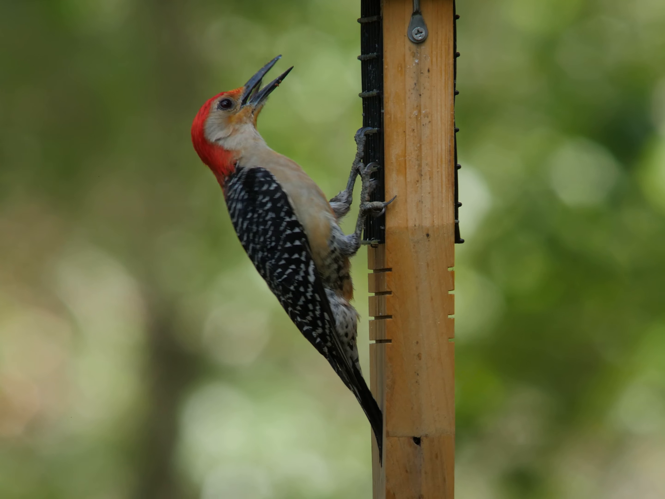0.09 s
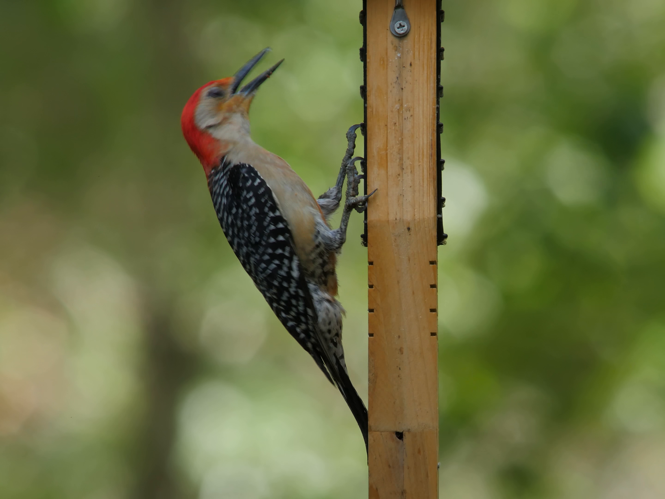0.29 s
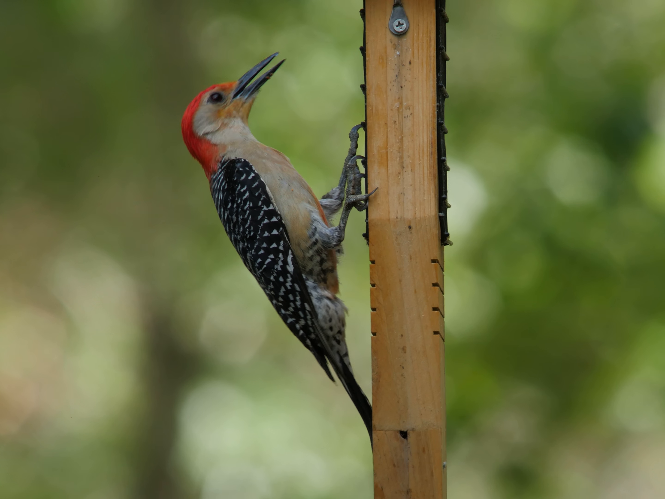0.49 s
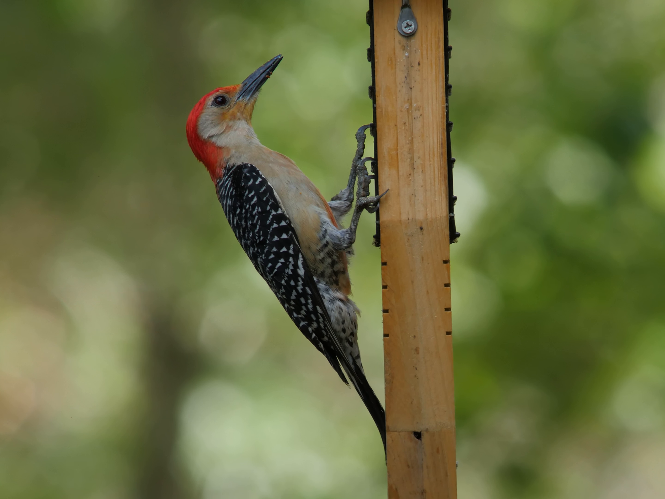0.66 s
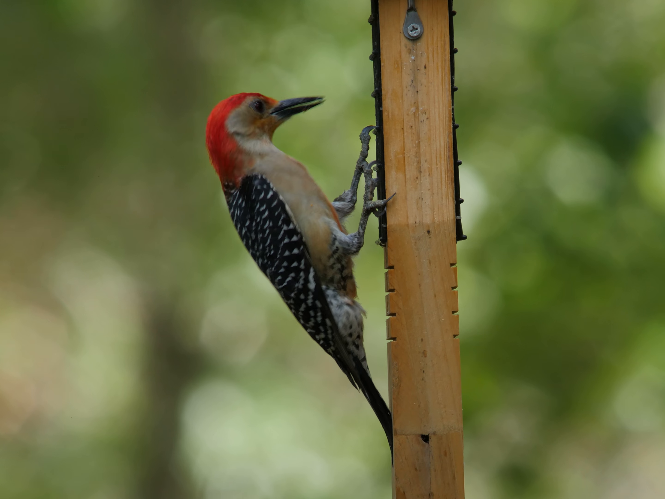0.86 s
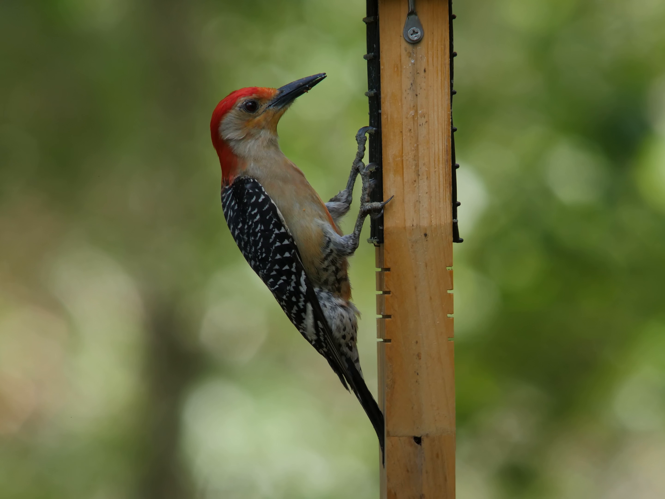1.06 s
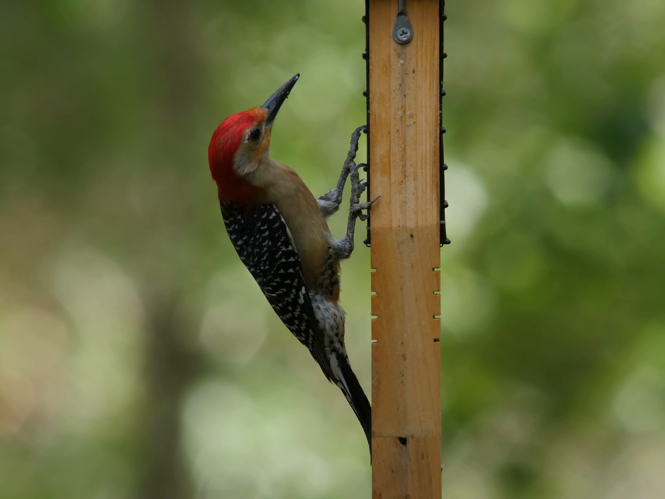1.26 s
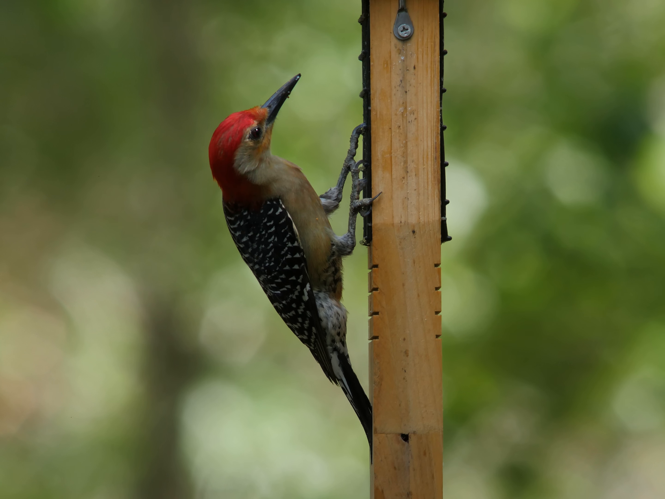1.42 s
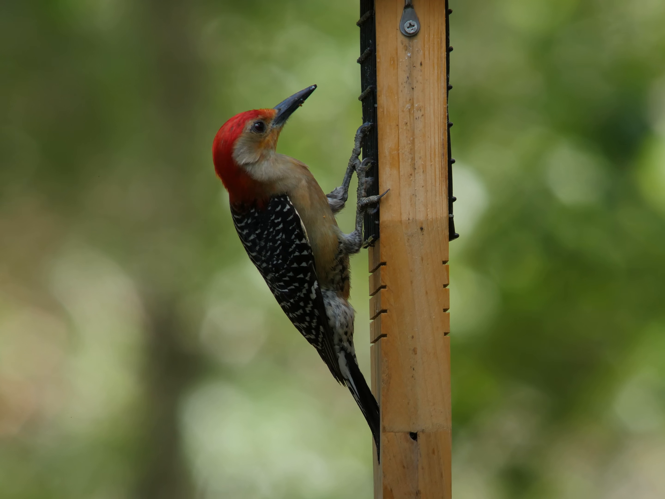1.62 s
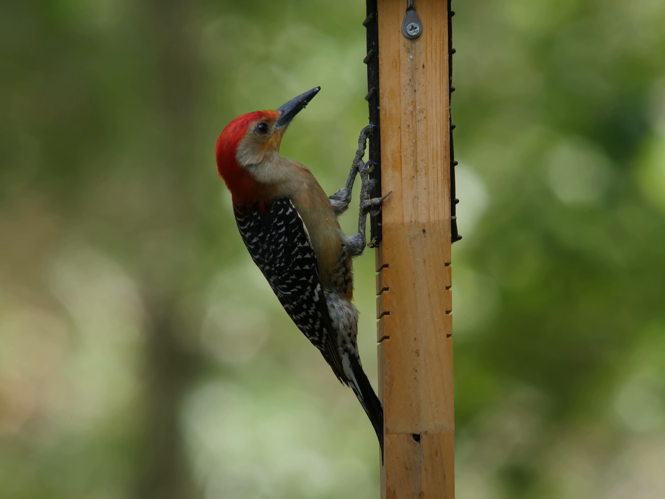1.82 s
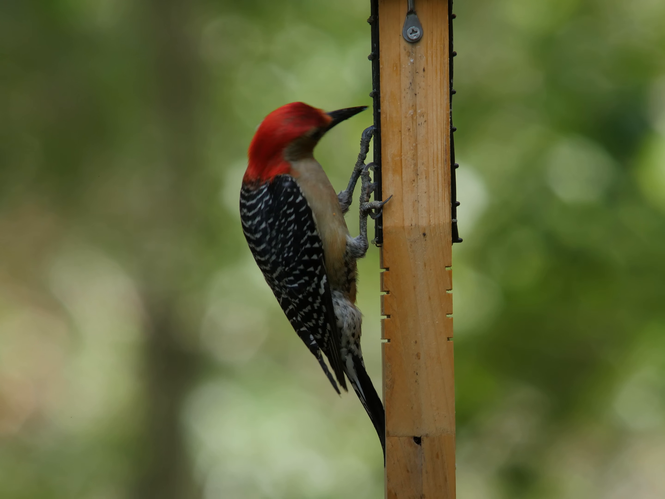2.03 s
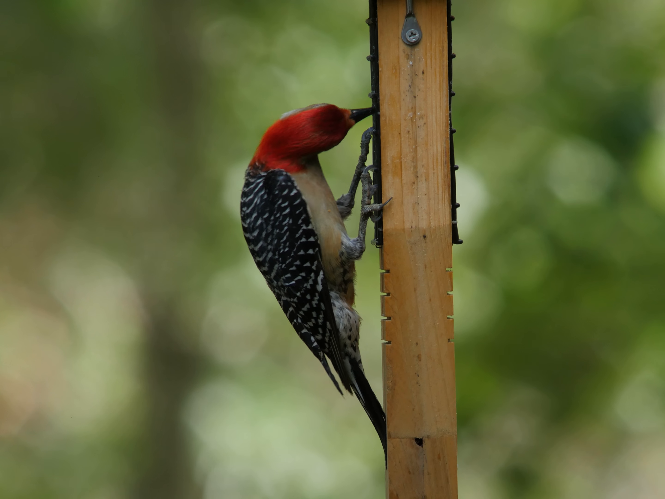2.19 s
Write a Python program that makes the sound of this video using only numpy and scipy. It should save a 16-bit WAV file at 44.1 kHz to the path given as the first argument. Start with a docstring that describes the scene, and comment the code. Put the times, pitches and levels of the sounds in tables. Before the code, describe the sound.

Outdoors in a leafy yard, a stereo microphone picks up a rapid woodpecker trill, slightly to the right, ringing away among trunks; faint distant birds, high steady insects, soft air and a distant machine hum remain.

```python
"""A woodpecker on a feeder whistles in a wooded yard that rings after it: one short rising note, then
seven rising two-note calls, each a gliding near-pure tone with a faint overtone, wall slaps and tree echoes.
Far birds whistle faintly as wavering glides, and a double tick of noise sounds at the feeder.
Insects buzz near 8 kHz as shaped noise and throbbing resonances; a distant machine drones in low
wavering sines; the yard's air is soft, patchy stereo noise."""
import sys
import numpy as np
from scipy import signal
from scipy.io import wavfile
from scipy.ndimage import uniform_filter1d

SR = 44100
rng = np.random.default_rng(int(sys.argv[2]) if len(sys.argv) > 2 else 0)


def to_linear_factor(level_db):
    """Convert decibel levels (scalar or array-like) to linear amplitude factors."""
    exponent = np.asarray(level_db, float) / 20
    return 10 ** exponent


def put_to_file(sound):
    """Save the sound as 16-bit audio at rate SR, in the file named by the first command-line argument."""
    columns = np.atleast_2d(sound).T  # one column per channel
    safe = np.clip(columns, -1, 1)
    whole_steps = np.round(safe * 32767)
    wavfile.write(sys.argv[1], SR, whole_steps.astype(np.int16))


N = 101429
T = np.arange(N) / SR


def evened(x):
    """Scales a sound to an rms of 1."""
    return x / np.sqrt(np.mean(x ** 2) + 1e-20)


def read(points, hz):
    """Reads a curve of (frequency, value) points along a logarithmic frequency axis."""
    f, value = np.transpose(points)
    return np.interp(np.log(hz + 1), np.log(f + 1), value)


def drift(top_hz):
    """Random wander of rms 1: twelve sines of random phase over the decade below top_hz."""
    total = np.zeros(N)
    for f in np.geomspace(top_hz / 10, top_hz, 12):
        total += np.sin(2 * np.pi * (f * T + rng.random())) / np.sqrt(f)
    return evened(total)


def resonate(x, hz, width_hz):
    """One resonance of gain 1: shifts hz down to zero, smooths there and shifts back."""
    turn = np.exp(2j * np.pi * hz * T)
    r = np.exp(-np.pi * width_hz / SR)
    return 2 * (turn * signal.lfilter([1 - r], [1, -r], x / turn)).real


def noise(spectrum, likeness, patchy_db):
    """Stereo noise of rms 1 with a given spectrum, left-right likeness and drifting loud and soft patches."""
    frames, hz = N // 256 + 5, np.fft.rfftfreq(1024, 1 / SR)
    a, b, c, d, patches = rng.standard_normal((frames, 513, 5)).T
    patches = uniform_filter1d(patches, 12, 0)  # across frequency
    patches = evened(uniform_filter1d(patches, 14, 1))  # across time
    same = np.clip(read(likeness, hz), -1, 1)[:, None]
    left = a + 1j * b
    right = same * left + np.sqrt(1 - same ** 2) * (c + 1j * d)
    z = np.array([left, right]) * to_linear_factor(read(spectrum, hz)[:, None] + patchy_db * patches)
    return evened(signal.istft(z, nperseg=1024, noverlap=768)[1][:, :N])


def echoes(x, t60s):
    """Scattered returns from trunks and leaves; three tails take turns so that like calls ring differently."""
    out = np.zeros((2, N))
    for k in range(3):
        # one tap of random sign at a random place in every 20 samples
        taps = np.zeros((2, SR))
        at = np.arange(200, SR - 20, 20) + rng.integers(0, 20, (2, (SR - 201) // 20))
        np.put_along_axis(taps, at, rng.choice([-1., 1.], at.shape), 1)
        # each frequency dies away at its own rate
        hz, t, z = signal.stft(taps, SR, nperseg=256)
        t60 = read(t60s, hz)[:, None]
        tail = signal.istft(z * to_linear_factor(-60 * t / t60) / np.sqrt(t60), SR, nperseg=256)[1]
        tail = tail / np.linalg.norm(tail[0])
        share = np.sqrt(2 / 3) * np.cos(np.pi * (T / 1.2 + k / 3))
        out += signal.fftconvolve((x * share)[None], tail, axes=1)[:, :N]
    return out


def air():
    """The yard's air: broad noise, partly alike left and right, with drifting patches."""
    # relative spectrum: (frequency [Hz], density [dB])
    air_spectrum = [(25, -8.5), (60, -19), (150, -3), (300, -7.5), (700, -12), (1050, -15.5), (1130, -8.5),
                    (1230, -15), (2000, -18), (3500, -20.5), (5000, -28), (7000, -23), (10000, -21.5),
                    (13500, -30.5), (15200, -23)]
    # left-right correlation: (frequency [Hz], likeness [-1 to 1])
    air_likeness = [(60, 0.49), (130, 0.98), (290, 0.77), (640, 0.14), (1410, -0.25), (3100, -0.3),
                    (6820, 0.075), (15000, 0.49)]
    return to_linear_factor(-59.5) * noise(air_spectrum, air_likeness, patchy_db=1.56)


def drone():
    """Low machine sines that waver in pitch and level; the strongest pair sinks midway and swells late."""
    # machine tones: (frequency [Hz], level before swell and waver [dB])
    tones = [(48.4, -79), (90, -84), (120.8, -66.5), (145.3, -70.5), (210, -77.5), (240, -74.5), (270, -77),
             (300, -82)]
    # level change of the swelling pair: (time [s], level [dB])
    swell = [(0, 3.5), (.5, 3), (1.0, -4.5), (1.4, 0.5), (1.8, 7.5), (2.3, 7.5)]
    waver_db, lag_s, pan_db = 2.5, 0.00013, -0.7  # lag and pan are of the left side
    swell_db = np.interp(T, *np.transpose(swell))
    out = np.zeros(N)
    for hz, db in tones:
        swells = 110 < hz < 160
        cycles = np.cumsum(hz * (1 + 0.0049 * drift(3.04))) / SR
        phase = 2 * np.pi * (cycles + rng.random())
        level_db = db + swells * swell_db + waver_db * drift(4.11)
        out += np.sqrt(2) * to_linear_factor(level_db) * np.sin(phase)
    return np.array([to_linear_factor(pan_db) * np.roll(out, round(lag_s * SR)), out])


def insects():
    """A smooth far chorus of noise and a few nearer singers, narrow noise bands that throb together."""
    # relative spectrum of the chorus: (frequency [Hz], density [dB])
    chorus = [(5000, -32.5), (6800, -20), (7380, -6.5), (7730, -1.5), (7860, -5), (7960, 1), (8260, 4),
              (8820, 0.5), (9100, -9.5), (9500, -33), (12500, -63)]
    # nearer insects: (frequency [Hz], width [Hz], level relative to singers_db [dB])
    singers = [(7630, 60, -8), (8020, 70, -5), (8240, 30, -5), (8425, 20, -4), (8478, 12, -2),
               (8547, 20, -2), (8755, 20, -3)]
    chorus_db, singers_db, likeness = -55.5, -63, 0.14
    throb_hz, throb_depth = 55, .45
    out = to_linear_factor(chorus_db) * noise(chorus, [(100, likeness), (20000, likeness)], patchy_db=.4)
    beat = 2 * np.pi * (throb_hz * T + rng.random())
    throb = 1 + throb_depth * (np.cos(beat) + .6 * np.cos(2 * beat))
    for hz, width_hz, db in singers:
        a, b = rng.standard_normal((2, N))
        band = evened(resonate(np.array([a, 0.5 * a + 1.12 * b]), hz, width_hz))
        out += to_linear_factor(singers_db + db) * throb * band
    return out


def tick():
    """A double tick at the feeder: two brief bursts of noise in a bright resonance, with a short hissing tail."""
    # ticks: (time [s], level of the noise before the resonance [dB])
    ticks = [(2.045, -54), (2.051, -50)]
    burst_t60_s, tail_db, tail_t60_s = .03, -13, .2
    shape = np.zeros(N)
    for start, db in ticks:
        age = np.maximum(T - start, 0)
        burst = to_linear_factor(-60 * age / burst_t60_s)
        tail = to_linear_factor(tail_db - 60 * age / tail_t60_s)
        shape += (T >= start) * to_linear_factor(db) * (burst + tail)
    a, b = rng.standard_normal((2, N))
    return resonate(shape * np.array([a + .5 * b, a - .5 * b]), hz=11900, width_hz=1300)


def far_birds():
    """Soft, unsteady sine glides, mostly heard as echo."""
    # far whistles: (start [s], length [s], first pitch [Hz], last pitch [Hz])
    glides = [(.152, .04, 7300, 6200), (.48, .24, 6480, 6500), (.885, .1, 3830, 3810),
              (.96, .12, 3750, 3100), (1.25, .06, 3500, 4350), (1.33, .075, 3870, 3350),
              (1.395, .06, 3300, 2620), (1.47, .06, 2800, 3170), (1.56, .1, 2680, 2820),
              (1.87, .08, 2720, 2800), (1.77, .17, 3840, 3790), (1.755, .05, 6900, 6150),
              (1.84, .1, 3750, 3200), (1.52, .08, 3170, 3150)]
    # level of each whistle before flutter and echo: [dB]
    glide_levels = [-57.5, -70.5, -61, -62, -62, -49, -49, -65, -54.5, -63.5, -59, -61, -59.5, -65]
    dry_db, wobble_share, flutter_db = -11, .008, 4
    wobble = 1 + wobble_share * drift(150)
    flutter = to_linear_factor(flutter_db * drift(120))
    out = np.zeros(N)
    for (start, length, from_hz, to_hz), db in zip(glides, glide_levels):
        progress = np.clip((T - start) / length, 0, 1)
        hz = from_hz + (to_hz - from_hz) * progress
        phase = 2 * np.pi * np.cumsum(hz * wobble) / SR
        out += to_linear_factor(db) * np.sin(np.pi * progress) ** .5 * np.sin(phase)
    out = out * flutter
    # leaves swallow the high whistles sooner: (Hz, t60 s)
    return to_linear_factor(dry_db) * out + echoes(out, [(4000, 1.3), (6500, 0.77)])


def whistles():
    """The bare calls: two gliding near-pure notes each, with one faint overtone that grows with effort."""
    # calls, the opening one with its second note only:
    # (start [s], stretch of the shape, first note level [dB], base pitch [Hz], second note level [dB])
    calls = [(0.031, 0.78, -95, 2170, -54), (.208, 0.9, -42.5, 2276, -42.5),
             (0.351, 0.93, -39.5, 2316, -40.5), (0.511, 0.93, -37, 2321, -39.5),
             (0.666, 0.98, -35, 2338, -40.5), (.822, 1.01, -35, 2334, -40),
             (.978, 0.98, -34.5, 2341, -43.5), (1.138, 0.97, -36, 2341, -39)]
    # first note climbs, flips up and rounds over: (time into the unstretched call [s], pitch ratio)
    first_glide = [(0, .96), (.007, 1.0), (.027, 1.025), (.049, 1.055), (.057, 1.11), (.068, 1.265),
                   (.076, 1.305), (.09, 1.27)]
    # second note climbs: (time into the unstretched call [s], pitch ratio)
    second_glide = [(.07, 1.04), (.083, 1.06), (.098, 1.105), (.111, 1.15), (.119, 1.155)]
    # levels at those points, relative to the note's level: [dB]
    first_shape = [-31.5, -13, -4, 0.5, -7.5, -14.5, -27.5, -20]
    second_shape = [-36, -0.5, -0.5, -4.5, -25]
    wobble_share, flutter_db = .002, 1.2
    harmonic = 5
    wobble = 1 + wobble_share * drift(130)
    flutter = flutter_db * drift(130)
    out = np.zeros(N)
    for start, stretch, first_db, base_hz, second_db in calls:
        notes = (first_glide, first_shape, first_db), (second_glide, second_shape, second_db)
        for glide, shape_db, note_db in notes:
            s, ratio = np.transpose(glide)
            s = start + s * stretch
            hz = base_hz * np.interp(T, s, ratio)
            phase = 2 * np.pi * np.cumsum(hz * wobble) / SR
            # more effort brightens the note; the overtone weakens by 7 dB for each kHz it climbs
            effort_db = .7 * (note_db + 39)
            climb_db = -7 * (harmonic * hz - 11500) / 1000
            overtone = to_linear_factor(-27.5 + effort_db + climb_db) * np.sin(harmonic * phase)
            level_db = note_db + flutter + np.interp(T, s, shape_db, -200, -200)
            out += np.sqrt(2) * (np.sin(phase) + overtone) * to_linear_factor(level_db)
    return out


def woodpecker():
    """The calls in the yard: later and softer on the left, slapped back by walls, ringing in near and far trees."""
    # walls that throw the call back: (delay [s], left level [dB], right level [dB])
    slap_walls = [(.034, -4.5, -8.5), (.052, -12.5, -13.5), (.083, -9.5, -15)]
    # ring of the near trunks: (frequency [Hz], t60 [s])
    near_ring = [(1000, 0.14), (2500, 0.28), (5000, 0.68), (12000, 0.082)]
    lag_s, pan_db, near_db, woods_db = .00036, -7, -.2, -11.5
    call = whistles()
    direct = np.array([np.roll(call, round(lag_s * SR)), call])
    near = direct + to_linear_factor(near_db) * echoes(call, near_ring)
    for delay, left_db, right_db in slap_walls:
        near += to_linear_factor(np.array([[left_db], [right_db]])) * np.roll(direct, round(delay * SR), axis=1)
    pan = to_linear_factor(np.array([[pan_db / 2], [-pan_db / 2]]))
    # the long ring of the far trees: (Hz, t60 s)
    woods = to_linear_factor(woods_db) * echoes(call, [(1000, 1.8), (4000, 1.8), (12000, 0.53)])
    return pan * near + woods


def scene():
    """Sums the woodpecker with everything around it."""
    return woodpecker() + far_birds() + tick() + insects() + drone() + air()


def low_pass(x):
    """Removes everything above the highest recorded frequency."""
    return signal.sosfilt(signal.butter(12, 16800, fs=SR, output="sos"), x)


def record(dry):
    """Band limit: a steep linear-phase low-pass takes off the top of the treble."""
    edge_hz = 15590
    lowpass = signal.firwin(1023, edge_hz, window=("kaiser", 9), fs=SR)
    limited = signal.oaconvolve(dry, lowpass[None], "same")
    return low_pass(limited)


dry = scene()
out = record(dry)
put_to_file(out)
```